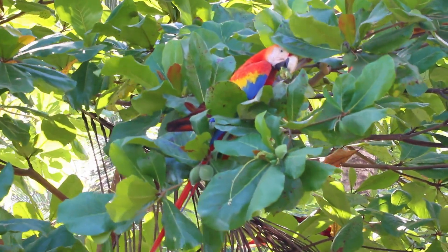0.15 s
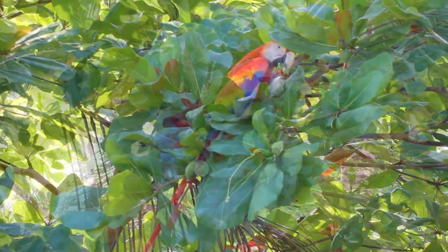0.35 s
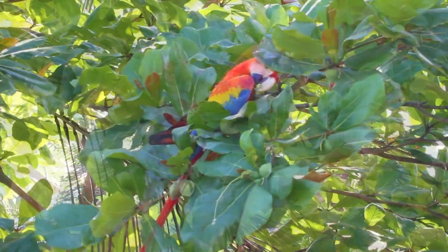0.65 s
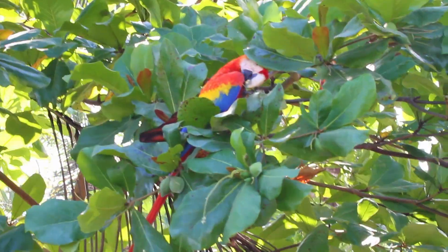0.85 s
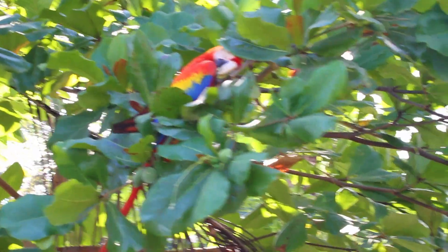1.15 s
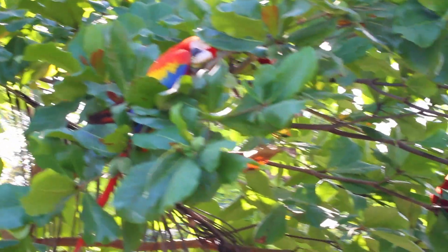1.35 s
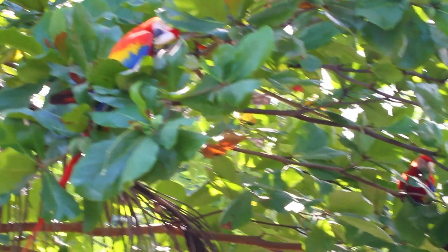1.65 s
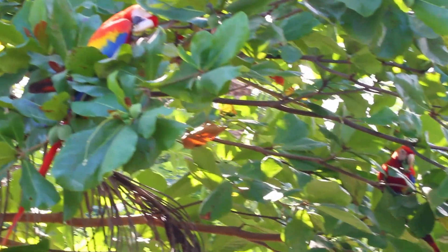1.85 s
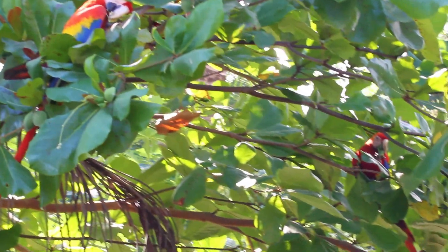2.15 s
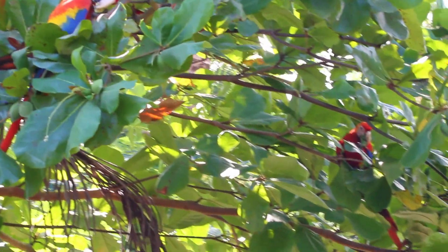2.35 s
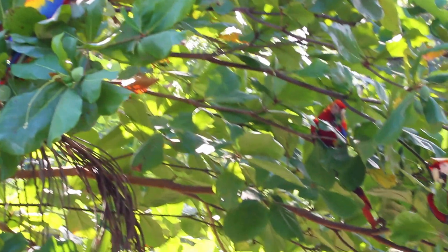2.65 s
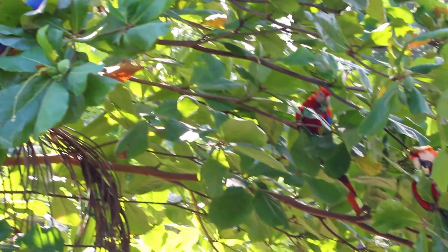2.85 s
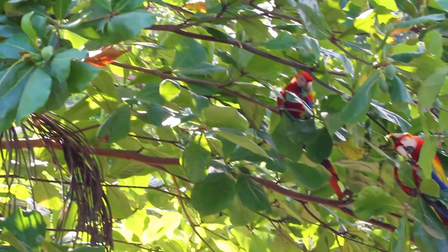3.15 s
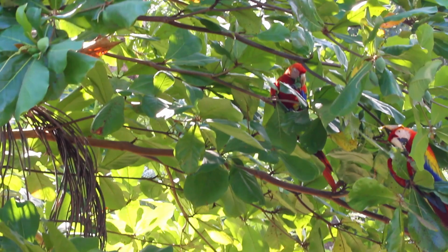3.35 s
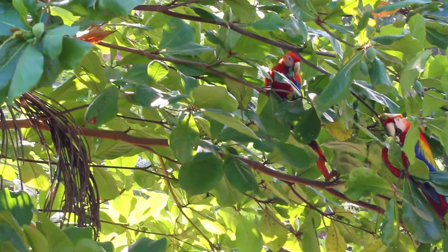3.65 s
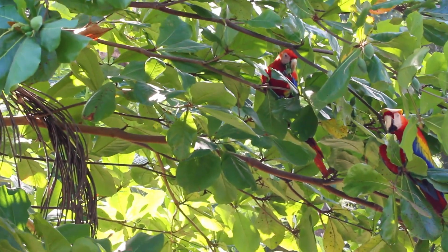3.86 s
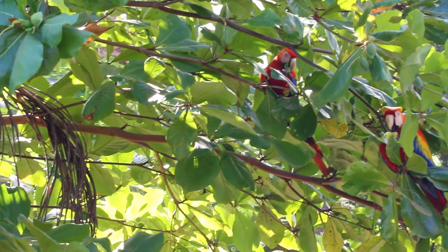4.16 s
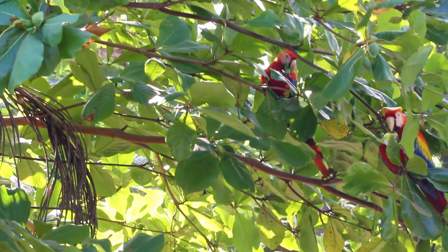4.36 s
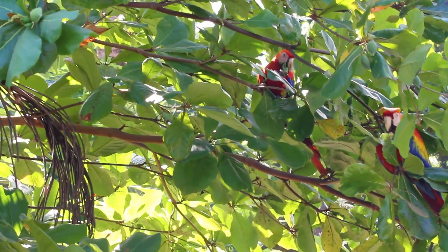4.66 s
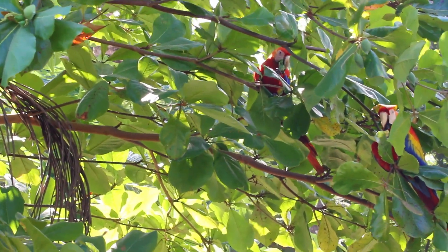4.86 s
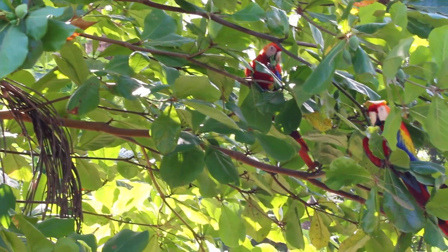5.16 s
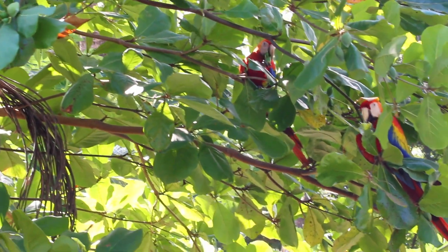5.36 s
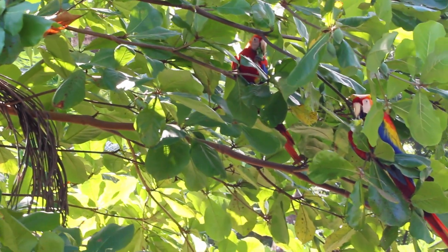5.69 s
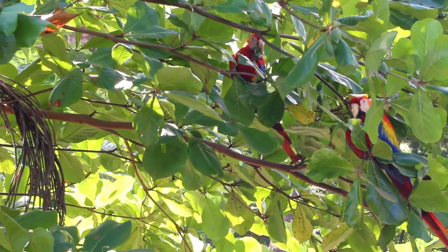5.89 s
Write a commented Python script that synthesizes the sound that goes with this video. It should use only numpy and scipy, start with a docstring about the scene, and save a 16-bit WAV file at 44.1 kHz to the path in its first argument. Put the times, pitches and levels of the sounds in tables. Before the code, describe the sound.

A steady, slightly wavering hiss like leaves fills an outdoor place, louder until an abrupt drop at 0.5 s, with soft low wind bumps on the single, centred microphone. Woody nut cracks and dry ticks cluster in the first 0.3 s, with a faint parrot croak near 0.3. Faint whistles and buzzy chirps run from 0.5 to 2 s, among small cracks at 0.7, 1.3 and 1.8. A bright snap comes at 2.6, whistles at 2.7, and a high plunging chirp with a wind thump near 3.2. After a tiny murmur, one harsh, growling parrot squawk bursts out at 3.5-3.8 s, its tail scattered by foliage. The loudest, sharp ringing crack hits at 4.4, beside a falling chirp. A tiny trill flickers at 5.0, a crack at 5.2, then a plunging chirp at 5.3 and soft whistles until 6 s.

```python
"""A large parrot gives one harsh squawk: noisy pulses of a voice membrane drive throat resonances.
Others crack nuts, each a brief shell ring with a noisy snap. Small birds chirp and whistle as sine notes
on pitch curves, over a hissing wash of coloured noise and low wind noise on one microphone.
Foliage scatters parrot, cracks, chirps and whistles into a short diffuse tail; gain control ducks loud moments."""
import sys
import numpy as np
from scipy import signal
from scipy.fft import rfft, irfft
from scipy.io import wavfile
from scipy.ndimage import uniform_filter1d

SR = 44100
rng = np.random.default_rng(int(sys.argv[2]) if len(sys.argv) > 2 else 0)


def wav_out(sig):
    """Save sig, one row per channel (or a flat mono array), as 16-bit PCM at SR to the path in sys.argv[1]."""
    wavfile.write(sys.argv[1], SR, np.round(np.clip(np.atleast_2d(sig).T, -1, 1) * 32767).astype(np.int16))


def how_loud(loudness_db):
    """Turn decibels into a plain amplitude multiplier (0 dB gives 1, 20 dB gives 10)."""
    steps = np.asarray(loudness_db, float) / 20
    return 10 ** steps


N = 265746
T = np.arange(N) / SR


def unit(x):
    """Normalisation: scales a signal to rms 1."""
    return x / np.sqrt(np.mean(x ** 2) + 1e-18)


def columns(table):
    """Linear interpolation of every column over time; the first column is seconds."""
    seconds, *rest = np.transpose(table)
    return [np.interp(T, seconds, column) for column in rest]


def gate(table, fade_s=0.004):
    """Windowing: one while the table lasts, with short ramps just outside it."""
    from_edge = np.minimum(T - table[0][0], table[-1][0] - T)
    return np.clip(from_edge / fade_s + 1, 0, 1)


def band(x, lo_hz, hi_hz, order=2):
    """Band-pass filtering with the flat passband of a Butterworth design."""
    edges = [lo_hz, min(hi_hz, SR / 2.1)]
    return signal.sosfilt(signal.butter(order, edges, "band", fs=SR, output="sos"), x)


def walk(rate_hz):
    """Smoothed random steps: a wander of rms 1, with new values drawn at the given rate."""
    k = int(SR / rate_hz)
    steps = np.repeat(rng.standard_normal(N // k + 1), k)
    return unit(uniform_filter1d(uniform_filter1d(steps, k), k)[:N])


def foliage(x, t60_s, wet_db):
    """Multiple scattering: leaves and trunks return dense, exponentially decaying noise after a short gap."""
    t = T[:SR // 2]
    scatter = rng.standard_normal(len(t)) * np.exp(-np.log(1000) * t / t60_s) * (t > .003)
    scatter = scatter / np.sqrt(np.sum(scatter ** 2))
    return how_loud(wet_db) * signal.fftconvolve(x, scatter)[:N]


# The background wash, with an abrupt early drop. Each row: time in seconds, level in dB,
# gain of the treble in dB.
WASH_LEVELS = [(0, -38.5, 1), (.515, -40.5, -1.5), (.525, -45, 1.5), (1.3, -43, 1.5), (2.83, -44, -0.5),
               (3.45, -42, -1.5), (4.04, -42, 1), (6.03, -43, -2)]
# Spectrum of the wash. Each row: frequency in Hz, level in dB.
WASH_SPECTRUM = [(60, -16), (115, -10.5), (160, -14), (244, -4), (400, -1), (600, -5), (1380, -3.5),
                 (1600, -2), (2600, -10), (3500, -7), (5000, -12.5), (7940, -19.5), (10500, -21),
                 (12100, -18.5), (14900, -28)]


def wash():
    """Spectral shaping of white noise: a hiss that wavers a little, its treble with its own swell."""
    level_db, treble_db = columns(WASH_LEVELS)
    hz, db = np.transpose(WASH_SPECTRUM)
    f = np.fft.rfftfreq(N, 1 / SR)
    colour = how_loud(np.interp(np.log(f + 1), np.log(hz), db))
    noise = irfft(rfft(rng.standard_normal(N)) * colour, N)
    noise = noise / np.std(band(noise, 510, 2460, order=4))  # the middle band sets the level
    treble = band(noise, 4300, 14000)
    return how_loud(level_db + walk(9)) * (noise + (how_loud(treble_db) - 1) * treble)


# Gusty buffeting of the microphone. Each row: time in seconds, level in dB.
WIND_LEVELS = [(0, -50.5), (.4, -43.5), (.57, -54.5), (2.25, -58), (2.4, -43.5), (2.65, -57), (3.1, -62),
               (3.2, -55), (3.5, -48), (3.6, -59), (4.1, -54.5), (4.7, -44), (5.1, -56), (5.8, -44),
               (6.03, -53)]
# Single pushes of wind. Each row: time in seconds, strength in dB before the band-pass.
WIND_PUSHES = [(0.049, -32), (0.29, -27), (0.364, -23.5), (2.398, -26), (2.538, -26), (2.573, -24.5),
               (3.135, -25), (3.193, -13.5), (3.219, -23), (3.254, -26), (3.434, -33), (4.678, -24),
               (4.798, -26), (5.379, -29.5), (5.76, -30), (5.895, -21), (5.959, -25.5)]


def wind():
    """Turbulent pressure: low noise in small puffs, and eddies that push the microphone membrane once."""
    puffs = how_loud(5.3 * np.tanh(walk(35))) * rng.standard_normal(N)
    buffeting = how_loud(columns(WIND_LEVELS)[0]) * unit(band(puffs, 107, 281))
    seconds, strength_db = np.transpose(WIND_PUSHES)
    eddies = np.zeros(N)
    eddies[((seconds + .001) * SR).astype(int)] = how_loud(strength_db)

    def held(length_s):
        return np.convolve(eddies, np.ones(int(length_s * SR)), "same")

    push = held(0.0019) + held(.02) * rng.standard_normal(N)  # a pulse within a burst of noise
    return buffeting + band(push, 109, 333)


def shell_split():
    """Impulsive fracture: the shell splits in one step with a short spray of splinters."""
    t = T[:SR // 100]
    return (t == 0) + .35 * rng.standard_normal(len(t)) * np.exp(-t / .0004)


def snap_band(split, lo_hz, hi_hz):
    """Band-limited impulse: one band of a split, scaled by the filter's own peak response."""
    impulse = 1. * (np.arange(len(split)) == 0)
    return band(split, lo_hz, hi_hz, order=1) / np.abs(band(impulse, lo_hz, hi_hz, order=1)).max()


# Beak cracks on nuts. Each row: time in seconds, peak of the ring in dB, ring pitch in Hz, snap against
# the ring in dB, topmost snap against the ring in dB, distance in m (it sets only the scatter).
NUT_CRACKS = [(0.04, -21.5, 2110, -4, -9, 3.2), (0.149, -17, 1090, -14, -6, 2.5),
              (0.193, -28, 851, 1, -2, 4.9), (0.286, -20.5, 1170, -3, 0, 13),
              (0.669, -27.5, 4040, -6, 0, 12), (1.299, -20, 4480, 1, -14, 21.4),
              (1.435, -31, 1220, -1, -10, 3.2), (1.782, -22, 1120, -10, -15, 8.5),
              (1.809, -30, 3950, 4, 2, 7), (1.87, -28.5, 3700, -12, -20, 12.5),
              (2.435, -23.5, 1260, 11, 12.5, 8.5), (2.55, -29, 3550, 9, 11, 4.6),
              (2.616, -12.5, 3520, 0, 12, 3.1), (3.024, -23.5, 1080, -13, -22, 19),
              (3.381, -25, 1370, 9.5, 11, 7.4), (4.387, -3.5, 3770, -14, -6, 6.3),
              (5.094, -28.5, 1220, -5, 0, 15), (5.197, -17, 3700, -2, 6, 7.9),
              (5.719, -29, 3730, -11, -10, 9.8), (5.954, -23, 1370, -12, -15, 3.2)]
EVEN_SCATTER_M = 9  # at this distance the ring feeds the leaves as strongly as the direct path


def cracks():
    """Damped resonance: a shell ring of a few cycles and a two-band snap; far ones are more scattered."""
    direct, feed = np.zeros(N), np.zeros(N)
    t = T[:SR // 100]
    swell_and_decay = 2.53 * (1 - np.exp(-t / 0.00032)) * np.exp(-t / 0.00062)
    for s, peak_db, ring_hz, snap_db, top_db, metres in NUT_CRACKS:
        split = shell_split()
        ring = np.sin(2 * np.pi * ring_hz * t) * swell_and_decay
        snap = how_loud(snap_db) * snap_band(split, 4000, 8800) + how_loud(top_db) * snap_band(split, 10500, 13000)
        at = int((s + 0.000984) * SR)
        direct[at:at + len(t)] += how_loud(peak_db) * (ring + snap)
        feed[at:at + len(t)] += how_loud(peak_db) * metres / EVEN_SCATTER_M * (ring + .7 * snap)
    return direct, feed


# Thin dry ticks. Each row: time in seconds, approximate peak in dB.
DRY_TICKS = [(0.055, -17.5), (0.193, -17), (1.283, -32), (1.33, -34), (1.38, -32), (1.426, -30),
             (4.107, -29), (4.141, -30)]


def ticks():
    """High-band impulse: a split heard in the treble alone, with no ring."""
    direct = np.zeros(N)
    for s, peak_db in DRY_TICKS:
        tick = how_loud(peak_db) * snap_band(shell_split(), 10000, 13000)
        at = int(s * SR)
        direct[at:at + len(tick)] += tick
    return direct, how_loud(-7) * direct


def notes(calls, flicker_db):
    """Frequency modulation: sine notes with a fast pitch shake; buzzy ones lose their direct path."""
    direct, feed = np.zeros(N), np.zeros(N)
    shake, flicker = walk(600), how_loud(flicker_db * walk(60))
    for s, hz, level_db, buzz in calls:
        at, t = int(s * SR), T[:len(hz)]
        span = slice(at, at + len(hz))
        ramp = np.clip(np.minimum(t, t[-1] - t) / 0.0016, 0, 1)
        phase = 2 * np.pi * np.cumsum(hz * (1 + buzz * shake[span])) / SR
        note = ramp * how_loud(level_db) * flicker[span] * np.sin(phase)
        direct[span] += note * np.exp(-(buzz / .014) ** 2)  # buzzy birds sit deep in the leaves
        feed[span] += note
    return direct, feed


# Short fading buzzes. Each row: start in seconds, length in seconds, starting pitch in Hz,
# starting level in dB, buzz as a share of pitch.
BUZZ_CALLS = [(0.257, .06, 9000, -49, .04), (0.831, .14, 9150, -44.5, 0.033),
              (1.211, 0.087, 6920, -47, .03), (1.739, .12, 4250, -42.5, .045),
              (1.77, .11, 10000, -46.5, 0.061), (2.105, 0.12, 8690, -42, .16),
              (2.743, .12, 4170, -41, .012), (3.145, .025, 11900, -42, .005),
              (4.129, 0.093, 9830, -41, 0.0237), (4.829, .08, 9300, -41, 0.041),
              (5.24, .02, 8200, -41, .011)]


def buzzes():
    """Random frequency modulation broadens a tone into a buzz, which sags and fades."""
    for s, length, hz, db, buzz in BUZZ_CALLS:
        u = T[:int(length * SR)] / length
        yield s, hz * (1 - .03 * u), db - 6.5 * u, buzz


def membrane(hz, jitter, scatter_db, breath):
    """Pulse excitation: uneven snaps of the voice membrane with breath noise, throbbing at a slow growl."""
    growl_hz = 59.7
    phase = np.cumsum(hz * (1 + jitter * walk(400))) / SR
    snaps = np.diff(np.floor(phase), prepend=0) * how_loud(scatter_db * np.tanh(walk(300)))
    growl = np.cumsum(growl_hz * (1 + .15 * walk(50))) / SR % 1
    throb = .5 + np.exp(-growl / .33)
    return (unit(snaps) + breath * rng.standard_normal(N)) * throb


def throat(x, modes, opening):
    """Formant filtering: parallel resonances of alternate sign, rebalanced by the beak opening."""
    waver_db = 2.0 * walk(40.09)
    voice = np.zeros(N)
    for k, (hz, width, shut_db, open_db) in enumerate(modes):
        # each mode takes the wander at another moment
        level_db = shut_db + opening * (open_db - shut_db) + np.roll(waver_db, k * SR // 5)
        voice += (-1) ** k * how_loud(level_db) * unit(band(x, hz - width / 2, hz + width / 2))
    return voice


# Envelopes of the softer croak, the murmur that leads in and the squawk.
# Each row: time in seconds, gain in dB.
CROAK_GAIN = [(0.26, -45), (0.292, -37), (0.4, -56)]
MURMUR_GAIN = [(3.44, -42), (3.47, -35.5), (3.51, -36)]
SQUAWK_GAIN = [(3.512, -49), (3.53, -30.5), (3.555, -23.5), (3.615, -18.5), (3.66, -21.5), (3.74, -19.5),
               (3.765, -24), (3.78, -33), (3.8, -62)]
# Lower and upper throat resonances. Each row: centre in Hz, width in Hz,
# level in dB with the beak shut, level in dB with it open.
LOWER_THROAT = [(586, 240, -12, -17.5), (868, 145, -1.5, -10), (1128, 203, -2, -3.5), (1466, 134, -3.5, 3),
                (1750, 260, -1.5, -0.5), (2170, 410, -20, -5.5)]
UPPER_THROAT = [(2480, 210, -9, -4), (2836, 260, -0.5, -5.5), (3200, 300, -1, -1.5), (3550, 250, -5, -3),
                (4080, 500, -8, -5.5), (4720, 330, -18, -7.5), (5480, 810, -9.5, -12.5),
                (7600, 1900, -19, -21), (9400, 1600, -26, -24.5), (11800, 1300, -25, -24),
                (14200, 1700, -26, -34)]


def parrot():
    """Source and filter: croak, murmur and squawk share one membrane; the beak opens through the squawk."""
    opening = np.interp(T, [3.59, 3.75], [0, 1])
    upper_db = np.interp(T, [3.740, 3.757], [3, -13])  # the upper throat closes near the end
    source = membrane(np.full(N, 354.7), jitter=.07, scatter_db=3, breath=.9)
    low = throat(source, LOWER_THROAT, opening)
    high = throat(source, UPPER_THROAT, opening)
    hum_hz, hum_width_hz = 1080, 210
    hum = unit(band(source, hum_hz - hum_width_hz / 2, hum_hz + hum_width_hz / 2))
    croak = gate(CROAK_GAIN) * how_loud(columns(CROAK_GAIN)[0]) * low
    murmur = gate(MURMUR_GAIN) * how_loud(columns(MURMUR_GAIN)[0]) * hum
    squawk = gate(SQUAWK_GAIN) * how_loud(columns(SQUAWK_GAIN)[0]) * (low + how_loud(upper_db) * high)
    return croak + murmur + squawk


# Falling slides. Each row: start in seconds, length in seconds, first pitch in Hz, last pitch in Hz,
# starting level in dB.
SLIDE_CALLS = [(.52, 0.17, 8800, 4790, -46.5), (4.227, 0.049, 11500, 10000, -44),
               (4.428, .27, 9030, 4180, -45.5), (5.224, 0.014, 11800, 6000, -35)]


def slides():
    """Downward frequency sweep: the pitch falls ever faster while the level sags midway and ends higher."""
    for s, length, from_hz, to_hz, db in SLIDE_CALLS:
        u = T[:int(length * SR)] / length
        hz = from_hz + (to_hz - from_hz) * u ** 1.4
        level_db = db + 7.5 * u - 6 * np.sin(np.pi * u ** 0.86) ** 2
        yield s, hz, level_db, .0135


# Lower whistles. Each row: start in seconds, length in seconds, first pitch in Hz,
# pitch the glide tends to in Hz (before the sag), starting level in dB.
WHISTLE_CALLS = [(0.803, 0.44, 3400, 3744, -45.5), (1.21, .25, 3700, 3980, -46.5),
                 (1.297, 0.14, 3206, 3326, -46), (1.51, .05, 3200, 3370, -50),
                 (1.631, 0.22, 3370, 3740, -42), (2.652, 0.13, 3480, 3700, -42.5),
                 (2.681, 0.081, 4360, 4850, -45), (2.77, 0.19, 3900, 3740, -40.5),
                 (3.237, .075, 3220, 3490, -47), (3.392, .11, 3400, 3420, -52),
                 (5.457, .12, 3470, 3470, -45), (5.48, 0.22, 4580, 4920, -46.5),
                 (5.659, .33, 4165, 3737, -43.5)]


def whistles():
    """Exponential glide: each whistle approaches its pitch while a steady sag and a fade pull it down."""
    settle_s, sag_hz_per_s, fade_db = .04, 720, 4.5
    for s, length, from_hz, settle_hz, db in WHISTLE_CALLS:
        t = T[:int(length * SR)]
        hz = settle_hz + (from_hz - settle_hz) * np.exp(-t / settle_s) - sag_hz_per_s * t
        yield s, hz, db - fade_db * t / length, .0052


# One small bird's dipped call. Each row: start in seconds, level in dB after the opening swell.
DIP_CALLS = [(1.44, -47), (5.391, -45)]


def dips():
    """Piecewise-linear frequency modulation: a held note swells, then its pitch dips quickly and returns."""
    length_s, dip_at_s, dip_half_s = .125, .085, .029
    t = T[:int(length_s * SR)]
    dip = np.maximum(1 - np.abs(t - dip_at_s) / dip_half_s, 0)
    before_dip = np.maximum(1 - t / (dip_at_s - dip_half_s), 0)
    for s, db in DIP_CALLS:
        yield s, 6900 - 1630 * dip, db - 7 * before_dip, .004


# Held chirps that plunge. Each row: time of the plunge in seconds, hold before it in seconds,
# top pitch in Hz, bottom pitch in Hz, level in dB as the plunge begins.
PLUNGE_CALLS = [(3.169, .036, 10640, 4900, -28), (4.236, .012, 9830, 6200, -34),
                (5.273, .018, 10200, 4470, -26.5)]


def plunges():
    """Exponential frequency sweep: a note rises and swells to its top, then plunges and fades."""
    plunge_s, tau_s, rise_share = 0.065, 0.019, 0.049
    swell_db, fade_db_per_khz = 12, 4.5
    for s, hold, top_hz, bottom_hz, db in PLUNGE_CALLS:
        t = T[:int((hold + plunge_s) * SR)] - hold
        before, after = np.maximum(-t / hold, 0), np.maximum(t, 0)
        held_hz = top_hz * (1 - rise_share * before ** 2)
        hz = bottom_hz + (held_hz - bottom_hz) * np.exp(-after / tau_s)
        level_db = db - swell_db * before ** .3 - fade_db_per_khz * (top_hz - hz) / 1000
        yield s - hold, hz, level_db, .005


# One fast trill, close by. Each row: time in seconds, middle pitch in Hz, level of the fundamental in dB.
TRILL_NOTE = [(4.963, 7700, -45), (4.985, 7850, -37), (5.003, 7600, -46)]


def trill():
    """Sinusoidal frequency modulation: a fast warble with its octave."""
    hz, level_db = columns(TRILL_NOTE)
    warble = 1 + .07 * np.cos(2 * np.pi * 75 * (T - 4.964))
    phase = 2 * np.pi * np.cumsum(hz * warble) / SR
    return gate(TRILL_NOTE) * how_loud(level_db) * (np.sin(phase) + how_loud(-9) * np.sin(2 * phase))


def scene():
    """Superposition: direct and scattered sounds add at one microphone, copied to two equal channels."""
    bird = parrot()
    crack, crack_feed = cracks()
    tick, tick_feed = ticks()
    chirp, chirp_feed = notes([*buzzes(), *slides(), *dips(), *plunges()], flicker_db=2.3)
    whistle, whistle_feed = notes(whistles(), flicker_db=2.3)
    mono = wash() + wind() + trill()
    mono = mono + crack + tick + foliage(crack_feed + tick_feed, 0.17, -0.61)
    mono = mono + how_loud(-3.0) * bird + foliage(bird, 0.5, -6.0)
    mono = mono + chirp + foliage(chirp_feed, 0.4, 1.4)
    mono = mono + whistle + foliage(whistle_feed, 0.71, -.1)
    return np.tile(mono, (2, 1))


def top_cut(x):
    """Nothing passes above the cut-off."""
    return signal.sosfilt(signal.butter(12, 16820, fs=SR, output="sos"), x)


def record(dry):
    """Compression and band-limiting: gain control ducks loud moments; the microphone cuts deep bass and top."""
    hold = np.exp(-1 / (0.068 * SR))  # averaging time constant in seconds
    loudness = np.sqrt(signal.lfilter([1 - hold], [1, -hold], dry ** 2))
    mix = dry * np.maximum(loudness / how_loud(-26.5), 1) ** -.3
    mix = np.tanh(mix)  # the preamplifier rounds the tallest peaks
    mix = signal.sosfilt(signal.butter(3, 88, "high", fs=SR, output="sos"), mix)
    mix = signal.sosfilt(signal.ellip(8, .2, 30, 15700, fs=SR, output="sos"), mix)
    return top_cut(mix)


dry = scene()
out = record(dry)
wav_out(out)
```